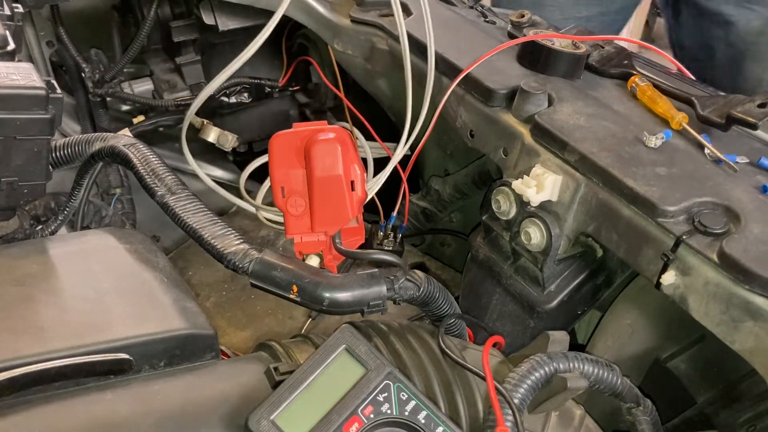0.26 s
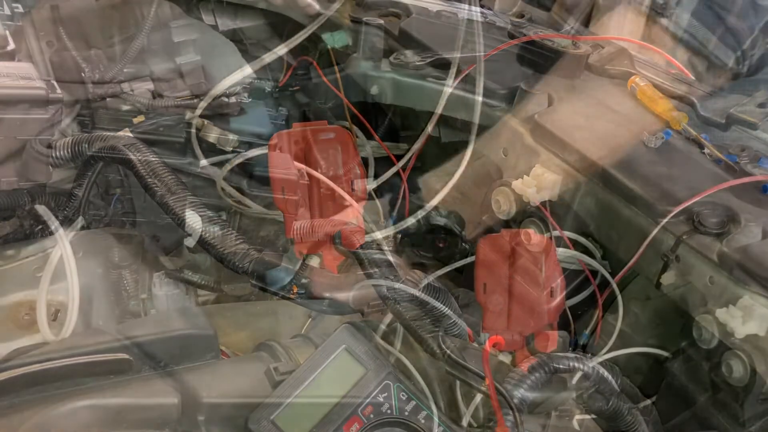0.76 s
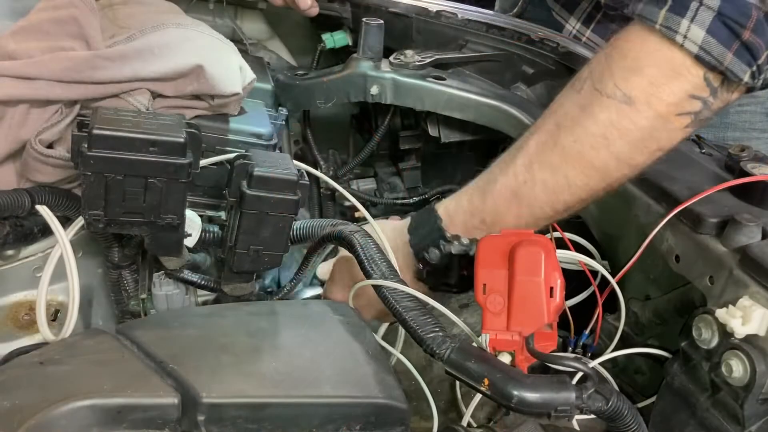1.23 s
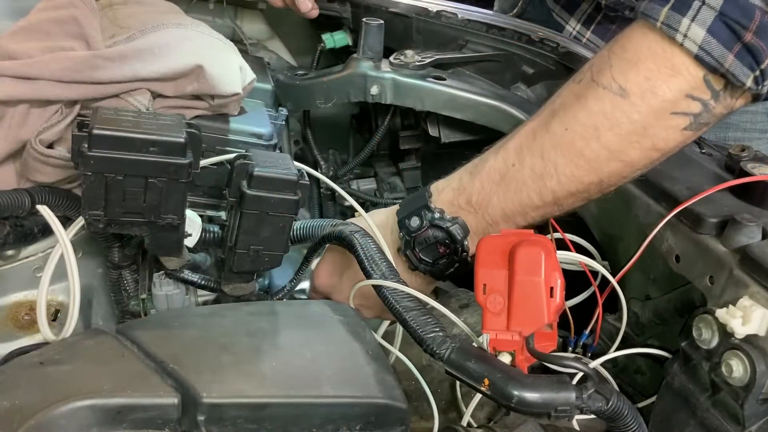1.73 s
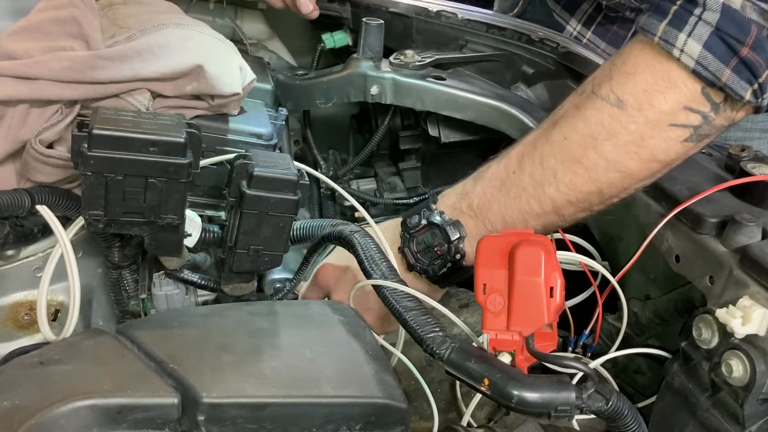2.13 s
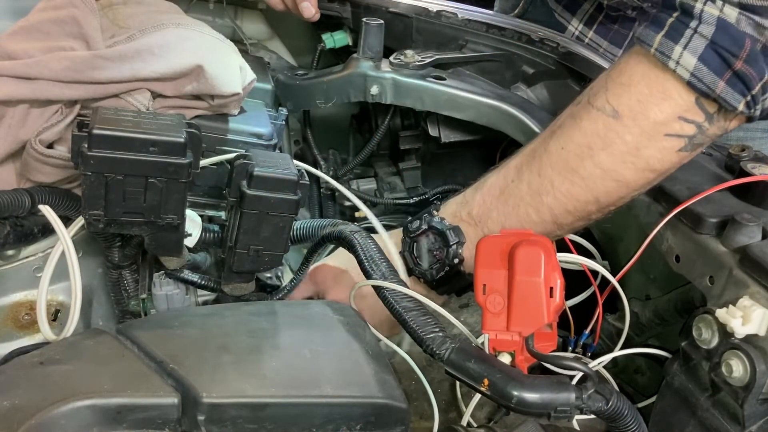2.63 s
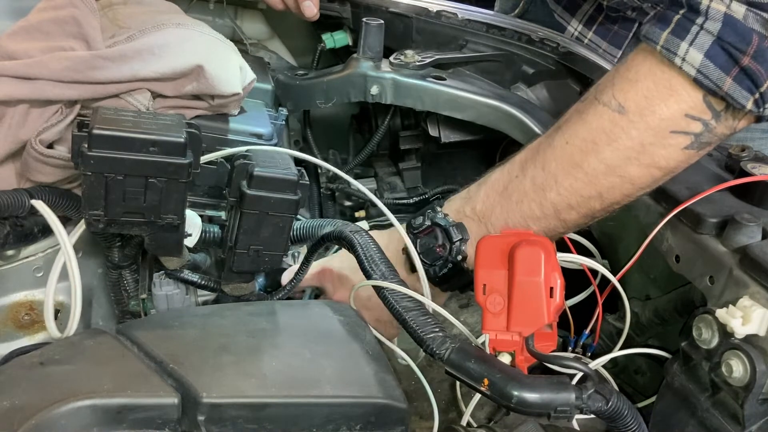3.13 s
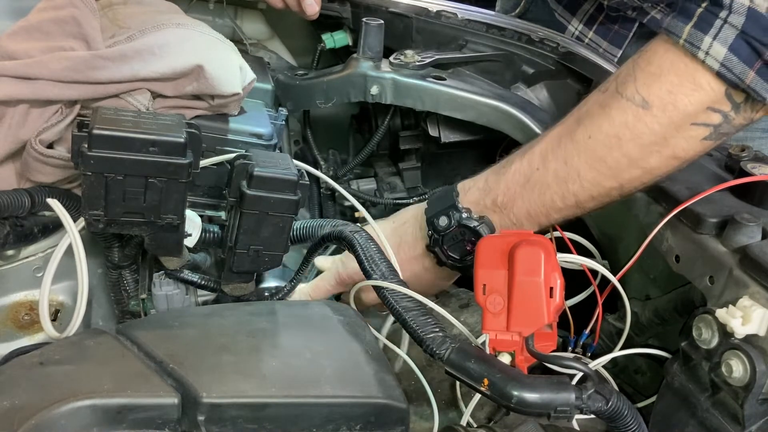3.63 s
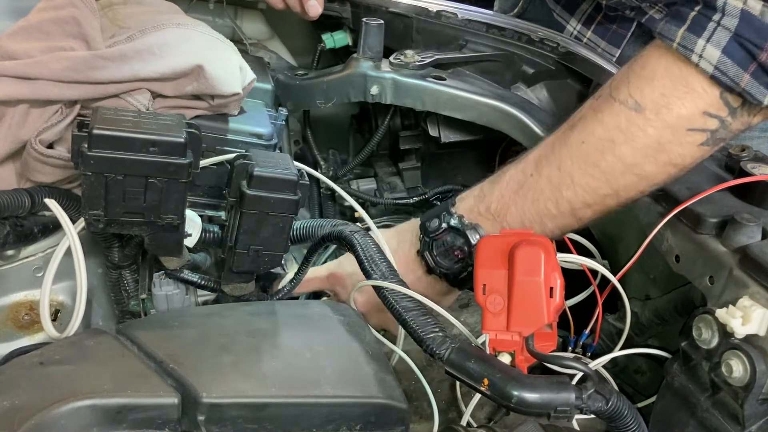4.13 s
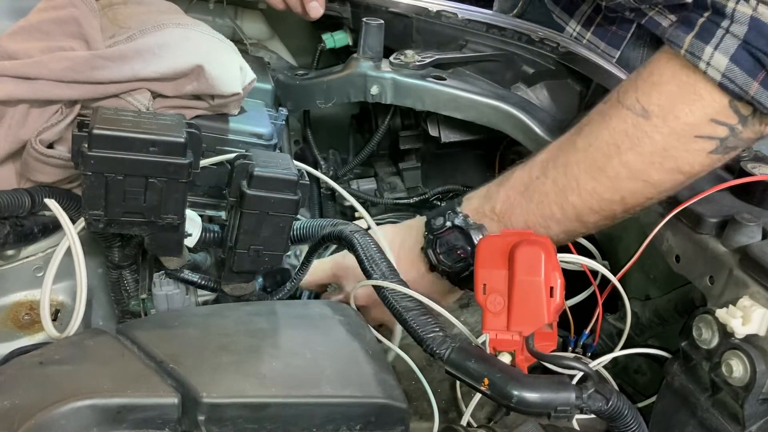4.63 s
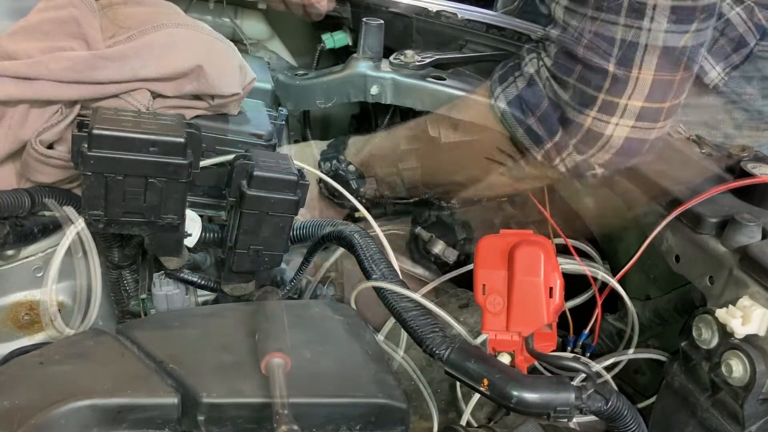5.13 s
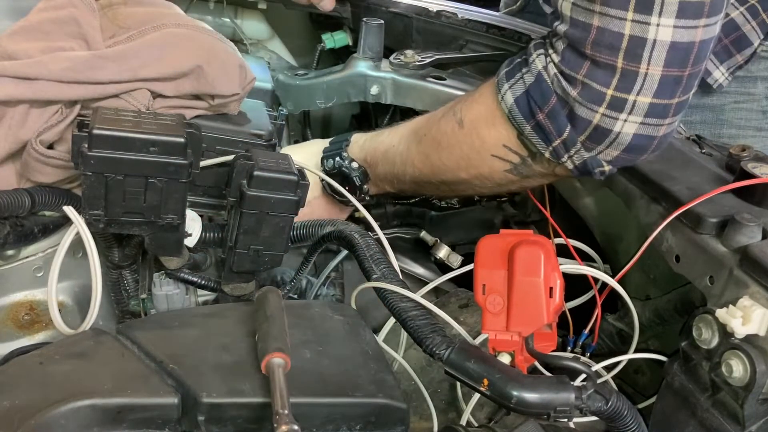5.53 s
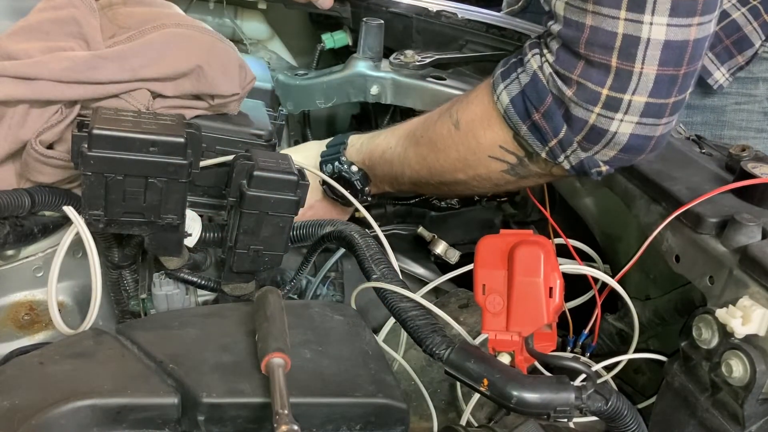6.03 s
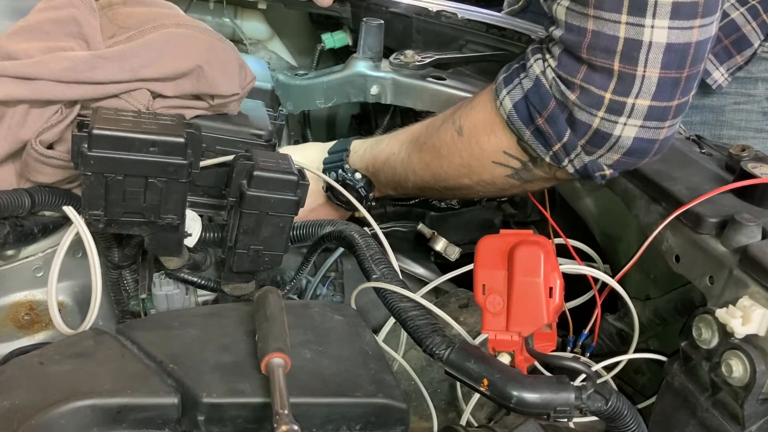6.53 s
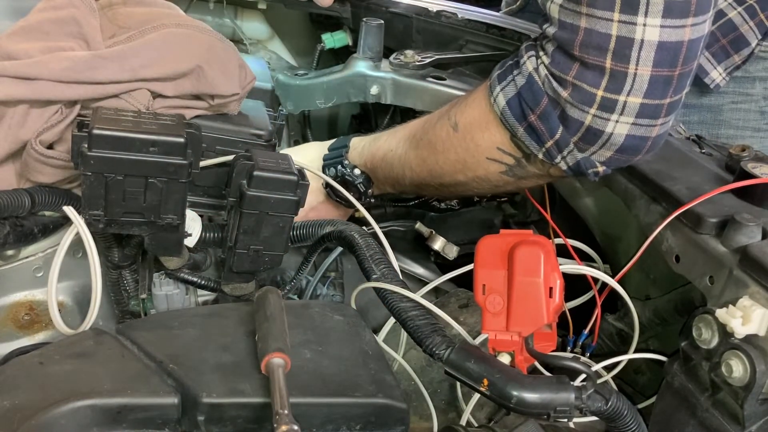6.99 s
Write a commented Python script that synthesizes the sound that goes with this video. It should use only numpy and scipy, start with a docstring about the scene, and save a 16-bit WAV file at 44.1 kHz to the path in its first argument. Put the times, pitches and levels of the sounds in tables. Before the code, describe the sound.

In a garage, a ratchet works inside a car's engine bay, heard from close by. It clicks slowly at first, then swings back in short, bright rasps. Between them the tool knocks against the engine, three times hard enough to ring a bracket and boom a plastic cover. A sleeve rubs softly along hoses. The ratcheting stops, leaving light ticks and scrapes of wires and small parts, and a steel clink near the end.

```python
"""Ratchet work in an engine bay.

Hand work deep in a car's engine bay, in a garage. A ratchet clicks slowly at first, then swings back
in short rasps, its pawl snapping over the teeth. On the working strokes it knocks against the engine,
three times hard enough to ring a bracket and boom a plastic cover. Small parts and wires tick and
scrape, a sleeve rubs along the hoses, and a steel part clinks near the end."""
import sys
import numpy as np
from scipy import signal
from scipy.fft import rfft, irfft
from scipy.io import wavfile

SR = 44100
rng = np.random.default_rng(int(sys.argv[2]) if len(sys.argv) > 2 else 0)


def materialize(psi):
    """Save the field psi as 16-bit PCM at rate SR to the path in sys.argv[1].

    A 1-D psi becomes a single channel; in a 2-D psi each row is a channel.
    """
    bounded = np.clip(np.atleast_2d(psi).T, -1, 1)
    quanta = np.round(bounded * 32767).astype(np.int16)
    wavfile.write(sys.argv[1], SR, quanta)


N = 320121
TIME_S = np.arange(N) / SR
EDGES_HZ = np.geomspace(25, 17000, 25)
CENTRES_HZ = np.sqrt(EDGES_HZ[1:] * EDGES_HZ[:-1])


def from_db(db):
    """Decibels to gain."""
    return 10 ** (np.asarray(db) / 20)


def at_hz(points, hz):
    """Read a table on a log-frequency axis."""
    freqs_hz, values = np.transpose(points)
    return np.interp(np.log(hz), np.log(freqs_hz), values)


def drift(time_s, rate_hz):
    """Straight lines between random values of unit spread."""
    knots = rng.standard_normal(4000)
    return np.interp(time_s * rate_hz, np.arange(len(knots)), knots)


def pulse(age_s, rise_s, t60_s):
    """Quick swell, exponential fall."""
    return (1 - np.exp(-age_s / rise_s)) * from_db(-60 * age_s / t60_s)


def add(track, start_s, piece):
    """Mix a piece into a track."""
    start = max(round(start_s * SR), 0)
    track[..., start:start + piece.shape[-1]] += piece[..., :max(N - start, 0)]


def noise_bands(size):
    """Stereo white noise split into bands."""
    # left-right likeness: freq_hz, correlation
    likeness = [(60, 0.98), (250, 0.88), (600, 0.48), (1500, 0.33), (4000, 0.033), (6000, 0.93),
                (7500, 0.99), (9000, 1), (14000, 0.93)]
    white, bands = rng.standard_normal((2, 2, size)), []
    for k, hz in enumerate(CENTRES_HZ):
        bandpass = signal.butter(2, EDGES_HZ[k:k + 2], "band", fs=SR, output="sos")
        mid, side = signal.sosfilt(bandpass, white[k % 2])
        alike = at_hz(likeness, hz)
        bands.append(np.sqrt((1 + alike) / 2) * mid + np.sqrt((1 - alike) / 2) * side * [[1], [-1]])
    return bands


def blows(bands, contacts, colour, decay, gain_db, rise_s, rise_cycles, soft_s, rebound_s, rebound_db):
    """Each blow and its rebound ring a crowd of close modes; low ones swell later and last longer."""
    out, age_s = np.zeros((2, N)), np.arange(SR // 4) / SR
    delays_s = rebound_s * rng.uniform(0.8, 1.0, len(contacts))
    for hz, band in zip(CENTRES_HZ, bands):
        power, t60_s = np.zeros(N), at_hz(decay, hz)
        rebound_share = from_db(rebound_db) ** 2 / (1 + (hz / 3500) ** 2)   # gentler, so less treble
        for (start_s, clack_db, thud_db, snap_db, ring_factor, *_), delay_s in zip(contacts, delays_s):
            level_db = at_hz([(450, thud_db), (1500, clack_db), (3600, clack_db), (9000, snap_db)], hz)
            softness = np.clip((clack_db - snap_db) / 10 - 1, 0, 1)   # dull contacts slide, build slowly
            swell_s = rise_s + rise_cycles / hz + soft_s * softness
            ring_power = (from_db(level_db) * pulse(age_s, swell_s, t60_s * ring_factor)) ** 2
            add(power, start_s, ring_power)
            add(power, start_s + delay_s, rebound_share * ring_power)
        out += from_db(gain_db + at_hz(colour, hz)) * np.sqrt(power) * band
    return out


def struck_spots(contacts, hollow_gain_db, hollow_t60_s, clack_gain_db, clack_t60_s, hollow_rise_s):
    """Each struck spot has its own hollow note and hard clack note."""
    out, age_s = np.zeros(N), np.arange(SR // 4) / SR
    for start_s, clack_db, thud_db, _, _, hollow_hz, clack_hz in contacts:
        hollow = from_db(thud_db + hollow_gain_db) * pulse(age_s, hollow_rise_s, hollow_t60_s)
        clack = from_db(clack_db + clack_gain_db) * pulse(age_s, hollow_rise_s / 2, clack_t60_s)
        add(out, start_s, hollow * np.sin(2 * np.pi * hollow_hz * age_s))
        add(out, start_s, clack * np.sin(2 * np.pi * clack_hz * age_s))
    return out


def ringing(hits, modes, uneven_db=1.0, detune=0.0015):
    """A part rings in a few clear modes, a little differently at each hit."""
    longest_s = max(t60_s for _, _, t60_s in modes)
    out, age_s = np.zeros(N), np.arange(int(longest_s * SR)) / SR
    for start_s, hit_db in hits:
        for (hz, mode_db, t60_s), (luck, shift) in zip(modes, rng.standard_normal((len(modes), 2))):
            tone = np.sin(2 * np.pi * hz * (1 + detune * shift) * age_s)
            gain = from_db(hit_db + mode_db - uneven_db * luck)
            add(out, start_s, gain * pulse(age_s, 2 / hz, t60_s) * tone)
    return out


def still_air(bands, gain_db):
    """Faint hiss over a rumble that sinks unevenly."""
    # air spectrum: freq_hz, density_db
    colour = [(25, -5.5), (50, 5), (100, -5.5), (300, -7.5), (1000, -22.5), (4000, -27.5), (16000, -27)]
    # rumble below 60 Hz: time_s, level_db
    rumble_levels = [(0, 7), (1, 2.5), (2.3, -3.5), (5.3, 1.5), (6.3, -5.5)]
    rumble = from_db(np.interp(TIME_S, *np.transpose(rumble_levels)))
    return sum(from_db(gain_db + at_hz(colour, hz)) * (rumble if hz < 60 else 1) * band
               for hz, band in zip(CENTRES_HZ, bands))


def knock_contacts():
    """The tool hits the engine and its covers; force and sharpness set each ring."""
    # knocks: start_s, clack_db, thud_db, snap_db, hollow_hz
    hits = [(0.1355, -43.5, -52.5, -58.5, 867), (0.215, -48, -50, -91, 757),
            (0.2905, -49.5, -45.5, -56, 311), (0.611, -34.5, -38.5, -45, 305),
            (0.6317, -58, -38.5, -68, 233), (0.745, -41, -49.5, -45.5, 723),
            (0.8866, -29.5, -30.5, -37, 224), (1.0365, -26.5, -37, -38, 363), (1.1116, -26, -38, -33, 248),
            (1.138, -9.5, -30.5, -17, 616), (1.1459, -22.5, -20.5, -22, 418),
            (1.2506, -34.5, -34.5, -40, 243), (1.502, -28, -35, -72, 273), (1.554, -26.5, -26, -40, 242),
            (1.6143, -11.5, -18.5, -15, 635), (1.9874, -44, -38.5, -59, 243), (2.008, -37, -35, -48.5, 217),
            (2.369, -39, -39.5, -42.5, 274), (2.396, -43, -42.5, -43, 300), (2.562, -44, -41.5, -44.5, 294),
            (2.614, -32.5, -33.5, -43, 329), (2.6357, -45, -62, -49.5, 346),
            (2.6921, -45, -46.5, -42.5, 442), (2.9091, -34.5, -37.5, -37.5, 325),
            (3.2495, -63, -46.5, -78, 227), (3.4789, -31.5, -34, -34.5, 224), (3.4969, -46, -40, -64, 290),
            (3.566, -40, -41, -38.5, 954), (3.6049, -33, -36.5, -35.5, 204), (3.781, -50, -47.5, -85, 259),
            (3.8442, -50, -44.5, -91, 210), (3.8901, -41.5, -43, -57.5, 286), (3.928, -38, -40, -47.5, 267),
            (4.152, -33, -39.5, -57, 301), (4.1789, -40, -37.5, -52, 238), (4.4589, -37, -35, -33.5, 291),
            (4.4847, -38.5, -43, -42.5, 269), (4.6877, -36, -34.5, -50.5, 602),
            (4.7629, -25, -32.5, -28.5, 520), (4.7888, -11, -33.5, -18.5, 730),
            (4.7977, -42, -20.5, -20.5, 260), (4.977, -36, -44.5, -49, 232), (5.204, -47, -48, -73, 293),
            (5.865, -51, -49.5, -68, 116)]
    # harder knocks are pressed home and ring shorter: level_db, ring_factor
    force_law = [(-43, 0.99), (-27, 1), (-23, 0.82)]
    # sharper contacts clack higher: snap_over_clack_db, clack_hz
    sharpness_law = [(-17, 1400), (-10.5, 2147)]
    contacts = []
    for start_s, clack_db, thud_db, snap_db, hollow_hz in hits:
        ring_factor = np.interp(max(clack_db, thud_db), *np.transpose(force_law))
        clack_hz = np.interp(snap_db - clack_db, *np.transpose(sharpness_law)) * rng.normal(1, 0.021)
        contacts.append((start_s, clack_db, thud_db, snap_db, ring_factor, hollow_hz, clack_hz))
    return contacts


def knocks(bands, contacts):
    """The struck engine gives a noisy ring and two notes per knock."""
    # knock spectrum: freq_hz, density_db
    colour = [(30, -25), (60, -8.5), (120, -3), (300, 6.5), (600, -3), (1100, -5), (2100, -9),
              (3500, -11.5), (7000, -9.5), (12000, -12.5), (16000, -26)]
    # ring time: freq_hz, t60_s
    decay = [(60, 0.21), (300, 0.17), (1000, 0.099), (2500, 0.095), (6000, 0.052), (14000, 0.061)]
    noise = blows(bands, contacts, colour, decay, gain_db=13, rise_s=0.0017, rise_cycles=1,
                  soft_s=0.0014, rebound_s=0.015, rebound_db=-7.5)
    notes = struck_spots(contacts, hollow_gain_db=-0.5, hollow_t60_s=0.1,
                         clack_gain_db=-8.5, clack_t60_s=0.047, hollow_rise_s=0.00067)
    return noise, notes


def sleeve_rub(bands, gain_db, catch_db, catches_per_s):
    """Cloth and skin catch and slide on the hoses; each arm shift swells, holds and dies away."""
    # arm shifts: start_s, length_s, low_db, swish_db
    rubs = [(0.275, .34, -59.5, -63), (0.702, 0.079, -48.5, -54), (0.974, 0.9, -46.5, -50),
            (1.069, 0.11, -36, -48.5), (2.23, 0.13, -70, -68), (2.438, .2, -48.5, -54),
            (2.92, 0.095, -41.5, -45), (3.237, 0.049, -63, -84), (3.567, 0.12, -55.5, -65),
            (3.886, 0.25, -55.5, -57), (4.603, 0.32, -50.5, -57.5), (4.932, 0.26, -54.5, -65),
            (5.843, 0.2, -64.5, -73), (6.017, 0.25, -65, -64.5), (6.372, 0.32, -65.5, -69.5),
            (6.885, 0.12, -56.5, -61), (7.06, 0.17, -59.5, -57)]
    # rub spectrum: freq_hz, density_db
    colour = [(40, -17), (120, -2), (350, 3.5), (700, -5), (1800, -1.5), (4000, -8.5), (8000, -11.5),
              (16000, -23)]
    attack_s, release_t60_s = 0.023, 0.33
    low, swish = from_db(-78.5), from_db(-87.5)   # the arm is never quite still
    for start_s, length_s, low_db, swish_db in rubs:
        attack = np.clip((TIME_S - start_s) / attack_s, 0, 1)
        release = from_db(-60 * np.clip((TIME_S - start_s - length_s) / release_t60_s, 0, 2))
        low = np.hypot(low, from_db(low_db) * attack * release)
        swish = np.hypot(swish, from_db(swish_db) * attack * release)
    grip = from_db(gain_db + catch_db * drift(TIME_S, catches_per_s))
    return grip * sum(from_db(at_hz(colour, hz)) * (low if hz < 1000 else swish) * band
                      for hz, band in zip(CENTRES_HZ, bands))


def tick_contacts():
    """Slow, bright ratchet clicks at the start, then light ticks of small parts and wires."""
    # pawl clicks up to 0.56 s, then parts and wires: start_s, clack_db, snap_db
    hits = [(0.332, -53, -51), (0.3475, -54, -47.5), (0.3645, -51, -48), (0.398, -53.5, -42),
            (0.463, -48, -43), (0.4897, -49.5, -42.5), (0.5284, -49, -38.5), (0.5588, -44.5, -35.5),
            (2.246, -52.5, -50), (2.819, -50.5, -53), (3.3298, -65.5, -55.5), (3.4615, -41, -55.5),
            (4.3959, -56.5, -56.5), (5.3054, -50, -61), (5.356, -43, -88), (5.412, -43.5, -49),
            (5.5282, -51, -60), (5.551, -46, -54), (5.6379, -40, -35.5), (5.7758, -44.5, -57.5),
            (5.841, -37, -49), (6.0132, -42.5, -54.5), (6.0755, -46.5, -47), (6.2382, -48.5, -59.5),
            (6.3714, -46, -59), (6.4218, -44, -46.5), (6.466, -33, -30), (6.575, -46.5, -60.5),
            (6.7128, -50.5, -52.5), (6.7517, -43, -62), (6.9035, -38, -44.5), (6.9543, -39, -53),
            (7.1029, -30, -28), (7.192, -42, -48)]
    # sharper ticks ring shorter: snap_over_clack_db, ring_factor
    ring_law = [(1.5, 0.81), (3.5, 0.7)]
    contacts = []
    for start_s, clack_db, snap_db in hits:
        hollow_hz, clack_hz = rng.normal(1, 0.044, 2) * (807, 1640)
        ring_factor = np.interp(snap_db - clack_db, *np.transpose(ring_law))
        thud_db = clack_db - 13
        contacts.append((start_s, clack_db, thud_db, snap_db, ring_factor, hollow_hz, clack_hz))
    return contacts


def ticks(bands, contacts):
    """Each slow ratchet click or tick of a part or wire gives a noisy ring and two faint notes."""
    # tick spectrum: freq_hz, density_db
    colour = [(40, 7.5), (120, 3), (300, -1), (800, -4), (1600, -6.5), (3000, -8), (5000, -4.5), (8000, -2),
              (12000, 0.5), (16000, -14.5)]
    # ring time: freq_hz, t60_s
    decay = [(100, 0.1), (1000, 0.16), (3000, 0.097), (7000, 0.067), (14000, 0.043)]
    noise = blows(bands, contacts, colour, decay, gain_db=12, rise_s=0.0015, rise_cycles=0.75,
                  soft_s=0.018, rebound_s=0.013, rebound_db=-11.5)
    notes = struck_spots(contacts, hollow_gain_db=-8.5, hollow_t60_s=0.19,
                         clack_gain_db=-10, clack_t60_s=0.062, hollow_rise_s=0.00072)
    return noise, notes


def wire_scrapes(width_octaves=0.57, edge_s=0.012, slips_per_s=314, slip_db=3.5):
    """A stiff wire sticks and slips along an edge, exciting one broad resonance."""
    # scrapes: start_s, length_s, level_db, pitch_hz
    scrapes = [(0.724, .06, -54, 1692), (5.2, 0.057, -60, 2400), (6.007, 0.06, -51.5, 2370),
               (6.143, 0.071, -67.5, 2170), (6.357, 0.08, -58, 2440), (6.626, .04, -59.5, 1730),
               (6.702, .04, -59, 2000), (6.743, 0.032, -56, 1400)]
    out, age_s = np.zeros((2, N)), np.arange(SR // 4) / SR
    for start_s, length_s, level_db, pitch_hz in scrapes:
        slips = from_db(slip_db * drift(age_s, slips_per_s))
        band_hz = pitch_hz * 2 ** (width_octaves * np.array([-.5, .5]))
        resonance = signal.butter(2, band_hz, "band", fs=SR, output="sos")
        grit = signal.sosfilt(resonance, slips * rng.standard_normal((2, len(age_s))))
        push = np.clip(np.minimum(age_s, length_s + edge_s - age_s) / edge_s, 0, 1)
        add(out, start_s, from_db(level_db) * push * grit / grit.std())
    return out


def tooth_drops(last_gap_ratio=1.35, jitter_s=0.0007, uneven_db=2):
    """The pawl drops off tooth after tooth as the swing slows, and off one more as it stops."""
    # back swings: start_s, run_s, tooth_count, pause_s, level_db
    swings = [(0.914, 0.068, 9, 0.012, -22.5), (1.292, .071, 10, .011, -21.5),
              (1.4369, 0.0021, 1, 0.025, -21.5), (1.725, 0.13, 13, 0.019, -21),
              (2.4216, 0.066, 9, .011, -20.5), (2.948, 0.071, 9, 0.024, -20),
              (3.9542, .081, 6, 0.036, -20.5), (4.514, 0.095, 10, .028, -20.5),
              (4.992, 0.094, 9, .019, -24.5)]
    # snaps are hardest mid swing: swing_share, level_db
    arch = [(0, -2.5), (.2, 0.55), (.6, 0.34), (1, -2)]
    drops = []
    for start_s, run_s, tooth_count, pause_s, level_db in swings:
        gaps = np.geomspace(1, last_gap_ratio, tooth_count - 1)
        ages_s = np.r_[0, run_s * np.cumsum(gaps / gaps.sum()), run_s + pause_s]
        arch_db = np.interp(ages_s / ages_s[-1], *np.transpose(arch))
        late, luck = rng.standard_normal((len(ages_s), 2)).T
        times_s = start_s + ages_s + jitter_s * late * (ages_s > 0)
        drops += zip(times_s, level_db + uneven_db * luck + arch_db)
    return drops


def pawl(bands, drops, gain_db, fresh_share, uneven_db, chatter_db):
    """Each tooth snaps and rings the pawl; the midrange comes later, scattered by nearby parts."""
    # snap spectrum: freq_hz, density_db
    colour = [(150, -12.5), (400, -9), (1000, -10), (2500, -8), (4500, -6.5), (5700, -6), (7100, -2),
              (9000, -4.5), (11500, 3.5), (12600, 1), (14000, -9.5), (16000, -3.5)]
    # pawl ring: freq_hz, level_db, t60_s
    modes = [(7034, -13, 0.041), (7960, -13.5, 0.036), (11510, -28, 0.011), (12800, -8.5, 0.03)]
    out, age_s = np.zeros((2, N)), np.arange(SR // 10) / SR
    scatter = pulse(age_s, rise_s=0.003, t60_s=0.047)
    snap = np.hypot(pulse(age_s, rise_s=0.0022, t60_s=0.026), scatter / 3)
    shapes = [from_db(at_hz(colour, hz)) * (snap if hz > 5500 else scatter) for hz in CENTRES_HZ]
    knots_s, previous_s = age_s[::20], -1
    for start_s, level_db in drops:
        offset = rng.integers(N - len(age_s))
        gains = from_db(uneven_db * rng.standard_normal(len(bands)))
        fresh = sum(gain * shape * band[:, offset:offset + len(age_s)]
                    for gain, shape, band in zip(gains, shapes, bands))
        fresh *= from_db(chatter_db * np.interp(age_s, knots_s, rng.standard_normal(len(knots_s))))
        if start_s - previous_s > 0.15:   # new stroke, new tool position; its snaps are much alike
            stroke = fresh
        tooth = np.sqrt(1 - fresh_share) * stroke + np.sqrt(fresh_share) * fresh
        add(out, start_s, from_db(level_db + gain_db) * tooth)
        previous_s = start_s
    return out + ringing(drops, modes, uneven_db=3, detune=0.024)


def bracket_clanks():
    """The hardest blows ring a bracket."""
    # blows: start_s, level_db
    hits = [(1.142, -40.5), (1.616, -42), (4.792, -26)]
    # bracket ring: freq_hz, level_db, t60_s
    modes = [(241, -4, 0.11), (367, 6.5, 0.18), (394.6, 2.5, 0.13), (1857, -7, 0.14), (2040, 1, 0.09),
             (2060, -9.5, .1), (2260, 7.5, 0.058), (2510, -3, 0.051), (2630, -10, 0.3), (3620, -11, 0.066),
             (4980, -20, .07)]
    return ringing(hits, modes)


def cover_booms():
    """The hardest blows boom the big plastic cover."""
    # blows: start_s, level_db
    hits = [(1.146, -44), (1.62, -37), (4.80, -37.5)]
    # cover ring: freq_hz, level_db, t60_s
    modes = [(66.5, -2.5, 0.48), (92, -5.5, 0.13), (113, 3.5, 0.17)]
    return ringing(hits, modes)


def steel_clinks():
    """A steel part rattles at one sharp touch."""
    # rattle: start_s, level_db
    hits = [(7.105, -37.5), (7.121, -41)]
    # steel ring: freq_hz, level_db, t60_s
    modes = [(1647, 12, 0.043), (4000, -21, 0.18), (4550, -14, 0.13), (5850, -18, 0.22), (7400, -25, 0.055),
             (8200, -24, 0.14)]
    return ringing(hits, modes)


def engine_bay(sound):
    """Hollows and covers resonate with the sound among them."""
    # bay resonances: freq_hz, width_hz, gain_db
    modes = [(123.1, 10, 9.5), (224.1, 22, -6), (318, 53, -10.5), (410, 17, -3.5), (511, 43, -5.5),
             (630, 48, -6.5), (817, 67, 0), (1430, 38, -4), (1715, 25, 2.5), (2141, 69, -6),
             (2430, 30, -12.5), (2737, 35, 2.5), (4870, 80, 4)]
    return sound + sum(from_db(gain_db) * signal.lfilter(*signal.iirpeak(hz, hz / width_hz, fs=SR), sound)
                       for hz, width_hz, gain_db in modes)


def garage_echo(sound, build_s):
    """Diffuse echo, longest in the bass."""
    # echo time: freq_hz, t60_s
    decay = [(100, 0.98), (500, 0.3249), (2000, 0.3753), (6000, 0.21), (14000, 0.3)]
    # echo spectrum: freq_hz, level_db
    colour = [(100, -14), (500, -10), (2000, -8.5), (6000, -6.5), (14000, -20.5)]
    age_s, response = np.arange(SR) / SR, 0
    for hz, band in zip(CENTRES_HZ, noise_bands(SR)):
        fall = pulse(age_s, build_s, at_hz(decay, hz))
        response += from_db(at_hz(colour, hz)) * band * fall / np.linalg.norm(fall)
    return signal.fftconvolve(sound, response, axes=1)[:, :N]


def scene():
    """Tool, small parts and sleeve in the bay, with garage echo and still air."""
    drops, knocked, ticked = tooth_drops(), knock_contacts(), tick_contacts()
    rasp = pawl(noise_bands(N), drops, gain_db=4.5, fresh_share=0.28, uneven_db=3, chatter_db=2)
    impact_bands = noise_bands(N)
    knock_noise, knock_notes = knocks(impact_bands, knocked)
    tick_noise, tick_notes = ticks(impact_bands, ticked)
    tones = knock_notes + tick_notes + bracket_clanks() + cover_booms() + steel_clinks()
    soft_bands = noise_bands(N)
    sleeve = sleeve_rub(soft_bands, gain_db=8, catch_db=2.5, catches_per_s=86)
    air = still_air(soft_bands, gain_db=-51.5)
    bay = engine_bay(knock_noise + tick_noise + sleeve) + tones + wire_scrapes()
    work = rasp + bay * from_db([[0.8], [-0.8]])   # bay slightly left
    return work + garage_echo(work, build_s=0.00097) + air


def record(dry):
    """The left microphone port hears the treble late and inverted; deep bass and the top are cut."""
    lag_s, split_hz, low_cut_hz, high_cut_hz = 0.000218, 4800, 41.6, 15850
    hz = np.arange(N + 1) * SR / (2 * N)
    treble_share = 1 / (1 + (split_hz / (hz + 1)) ** 8)
    phase_turn = np.exp(1j * treble_share * (np.pi - 2 * np.pi * hz * lag_s))
    left = irfft(rfft(dry[0], 2 * N) * phase_turn, 2 * N)[:N]
    highpass = signal.butter(2, low_cut_hz, "high", fs=SR, output="sos")
    lowpass = signal.ellip(10, 0.2, 70, high_cut_hz, fs=SR, output="sos")
    return signal.sosfilt(lowpass, signal.sosfilt(highpass, [left, dry[1]]))


dry = scene()
out = record(dry)
materialize(out)
```